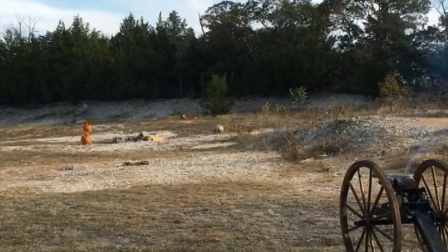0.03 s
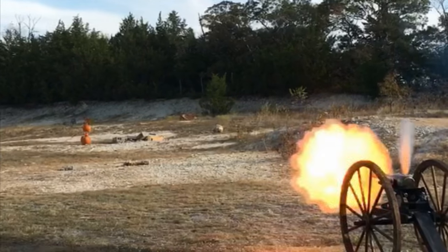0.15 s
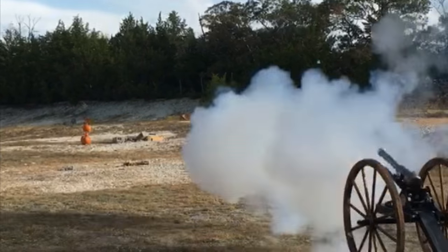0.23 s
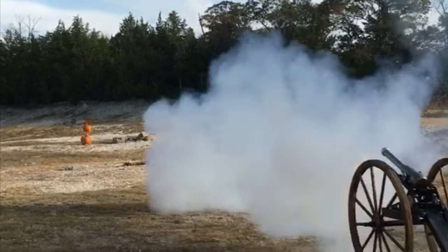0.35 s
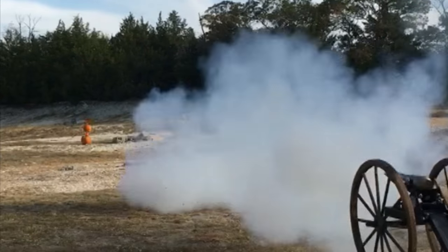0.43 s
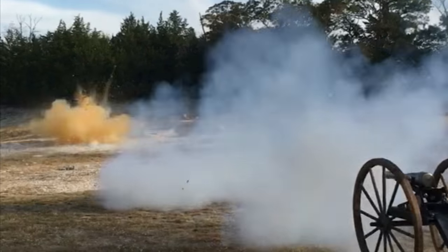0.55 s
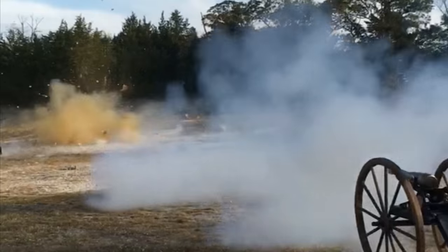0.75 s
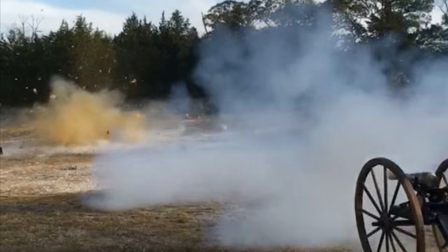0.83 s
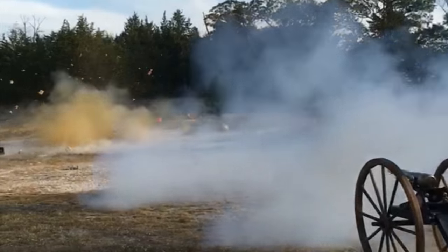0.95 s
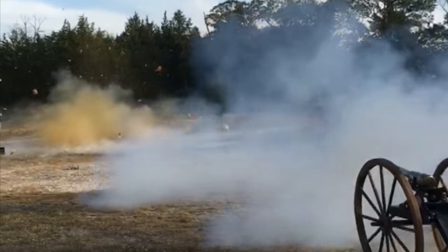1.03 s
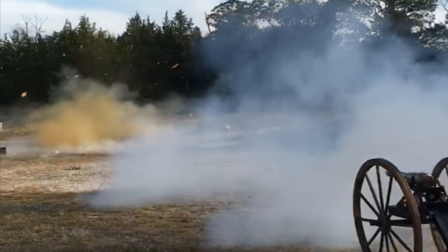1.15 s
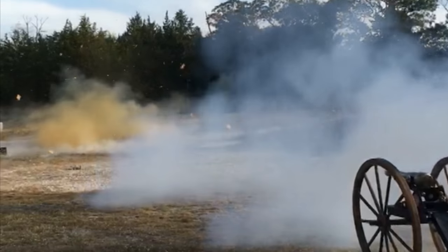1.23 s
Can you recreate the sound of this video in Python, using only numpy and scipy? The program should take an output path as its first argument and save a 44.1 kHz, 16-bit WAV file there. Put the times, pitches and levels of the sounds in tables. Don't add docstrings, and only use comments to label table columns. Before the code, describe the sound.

Outdoor cannon blast in an open field, bright cracks and a bassy push of air, then a cluster of louder, crunchy explosions downrange and a darkening tree-line rumble, captured by a small overloaded microphone.

```python
import sys
import numpy as np
from scipy import signal
from scipy.io import wavfile

SR = 44100
rng = np.random.default_rng(int(sys.argv[2]) if len(sys.argv) > 2 else 0)


def boost(x):
    u = np.asarray(x, float) / 20
    return 10 ** u


def to_wav(sig):
    pcm = np.clip(np.atleast_2d(sig), -1, 1) * 32767
    pcm = np.round(pcm).astype(np.int16)
    wavfile.write(sys.argv[1], SR, pcm.T)


N = 57330

# onset t/s, level/dB, length/s, body f/Hz, bright edge re body/dB
SHOCK_FRONTS = [(.2290, -25.5, 0.0044, 800, -15), (0.2368, -15.5, 0.0034, 600, -25),
                (0.276, -19, 0.0044, 2200, -8), (0.283, -24, 0.002, 1500, -10),
                (.2880, -21, 0.0042, 2100, -10), (.3000, -23, 0.0045, 2300, -10),
                (.3060, -23.5, 0.0032, 1000, -15), (0.2423, -15, 0.014, 776, -4),
                (.2430, -19, 0.0028, 3520, 5.5), (.3940, -29, 0.002, 2070, -35),
                (0.389, -39.5, 0.01, 292, -28), (0.411, -37, 0.0011, 2000, -23),
                (0.5254, -12, 0.0018, 784, -9), (0.5338, -14, 0.0012, 940, -15),
                (.5420, -25, 0.005, 1820, -9), (0.576, -12, 0.0038, 1000, -7.5),
                (0.582, -21, 0.002, 1100, -4), (.5950, -28, 0.0018, 900, -5),
                (0.6015, -12, 0.0018, 1100, -13), (0.604, -15.5, 0.0085, 665, -9),
                (.6150, -22, 0.0016, 1500, -7), (0.622, -19.5, 0.0035, 1280, -15),
                (0.633, -25, 0.004, 1100, -9), (0.645, -25, 0.0036, 650, -18),
                (.6222, -16, 0.0032, 2200, -30), (0.669, -37, 0.0018, 3000, -6),
                (0.674, -14.5, 0.0026, 2620, -2.5), (0.681, -18, 0.0016, 2600, -1.5),
                (0.7061, -14.5, 0.0016, 900, -39), (0.7119, -9.5, 0.001, 1020, -31),
                (.7380, -20, 0.001, 2000, -25), (.6900, -24, 0.006, 2500, -8),
                (.7240, -22, 0.006, 1500, -10), (0.743, -23, 0.002, 1000, -20),
                (.7820, -25, 0.004, 720, -30), (.9170, -33.5, 0.008, 1000, -40),
                (.9600, -30.5, 0.013, 920, -50), (1.050, -36, 0.01, 1000, -50),
                (1.099, -35.5, 0.0094, 1100, -50), (1.128, -42.5, 0.007, 1700, -50),
                (0.887, -32.5, 0.0088, 2800, -50)]
# crest t/s, peak level/dB, f/Hz, length/cycles
PRESSURE_PUNCHES = [(.2375, -17, 590, 4.9), (.2838, -10.5, 200, 2.5), (.2418, -6.5, 850, 2.9),
                    (.6022, -12, 630, 2), (0.6985, -15.5, 134, 1.9), (.2500, -22, 188, 5.6),
                    (.2575, -7, 250, 1.5), (0.49, -29, 134, 1.1), (.5290, -13.5, 209, 2.7),
                    (.5272, -5, 980, 2.3), (.5340, -13.5, 930, 3.2), (.5772, -11, 600, 2.8),
                    (.6055, -14, 560, 3.5), (.6110, -17, 640, 3.5), (.2290, -34.5, 240, 2.1),
                    (.2400, -14, 430, 2.3), (.6790, -14.5, 346, 4.6), (.6775, -7.5, 780, 2.3),
                    (.6868, -15.5, 330, 2.3), (.7045, -7.5, 247, 1.93), (0.64, -12.5, 360, 2.5),
                    (.7350, -17.5, 320, 3), (.7056, -9.5, 680, 1.9), (.7200, -15, 330, 2.0),
                    (.7700, -20, 250, 3.0), (.7940, -19.5, 250, 1.5), (.8100, -24, 270, 2.5),
                    (.8320, -18.5, 280, 2.0), (.8375, -17.5, 223, 1.8), (.8500, -21, 270, 3.6),
                    (.3650, -38.5, 197, 4.0), (.8770, -19, 67, 2.5), (.8960, -24, 70, 2.5),
                    (1.2600, -31, 85, 4.0), (1.2350, -31, 87, 2.0), (1.1760, -31, 90, 3.0),
                    (.9500, -26, 90, 2.5), (.9890, -27, 90, 2.5), (.9200, -30, 300, 5.0),
                    (.3900, -36, 290, 4.3), (0.73, -25, 69, 2.9)]
# crest t/s, peak level/dB, f/Hz, length/cycles
AIR_THUMPS = [(.2625, -7, 135, 1.67), (.2770, -8, 61.6, 2.25), (0.295, -11, 67, 1.5), (0.31, -14, 67, 2.9),
              (.3400, -28, 54.6, 3.5), (0.532, -24.5, 75, 4.6), (.5870, -5.5, 84, 2.6),
              (.6035, -10.5, 105, 1.4), (0.6135, -7.5, 90, 1.4), (.6880, -3, 98, 1.75),
              (.7015, -7.5, 69.5, 1.37), (.7092, -5.5, 125, 1.9), (.7172, -5.5, 112, 1.9),
              (.7305, -5.5, 62, 2.0), (.7440, -8, 125, 1.8), (.7505, -11, 110, 1.7),
              (0.7655, -10.5, 85, 1.7), (.7745, -16, 120, 1.8), (.7865, -18, 115, 1.7),
              (0.8015, -7.5, 115, 3), (.8300, -11, 101, 0.76), (.8450, -9.5, 90, 1.26),
              (0.859, -12, 86, 1.3), (.9250, -23, 102, 4.9), (.9690, -21, 105, 2.3), (1.0100, -22.5, 91, 4),
              (1.054, -25.5, 79, 6.6), (1.0980, -25, 93.7, 4.8), (1.1250, -26.5, 86, 6.3),
              (1.1550, -29, 83, 5.6), (1.223, -25, 92.6, 3.1), (1.2850, -28, 75, 2.1)]
# t/s, level/dB, air path/m
MUZZLE_GAS = [
    (.220, -72, 10),
    (.226, -31.5, 22),
    (.238, -30.5, 48),
    (.246, -15.5, 7.9),
    (.260, -25, 26),
    (.278, -15.5, 34),
    (.308, -22, 60),
    (.340, -38.5, 4.1),
    (.368, -45.5, 2.7),
    (.43, -47, 58),
]
# t/s, level/dB, air path/m
TREE_ECHO = [(.43, -48.5, 70), (.496, -35.5, 100), (.524, -34.5, 111), (.528, -26, 41), (.573, -32.5, 70),
             (.578, -22.5, 40), (.598, -26, 45), (.602, -21.5, 45), (.63, -23, 50), (.658, -34.5, 50),
             (.673, -29.5, 40), (.678, -23, 50), (.736, -22, 64.4), (.76, -27.5, 71), (.9, -31, 115),
             (1.0, -35, 180), (1.08, -34.5, 228), (1.17, -39.5, 293), (1.3, -45.5, 380)]
# crest t/s, peak level/dB, f/Hz, length/cycles
WIND_LUMPS = [(.005, -29.5, 71.5, 3.5), (.031, -42.5, 109, 3.1), (.056, -41, 80, 2.9),
              (.102, -33, 76.5, 2.6), (.122, -33.5, 93, 2), (.134, -30, 81, 1.24), (.150, -36, 93, 0.96),
              (.161, -32.5, 83, 1.9), (.216, -35, 80, 1.4), (.400, -34, 60.3, 2.2), (.440, -46, 55, 2.2),
              (.478, -34, 320, 3.3), (.030, -46, 250, 3.0), (.110, -46, 200, 3.0), (.485, -30.5, 69.4, 3.4)]
# f/Hz, density/dB
MUZZLE_SPECTRUM = [(100, -7), (200, 4), (450, -2.5), (1000, 1.5), (2200, 1), (5000, -5.5), (9000, -8),
                   (15000, -16.5)]
# f/Hz, density/dB
ECHO_SPECTRUM = [(60, -15), (200, 4), (420, -3), (800, 4), (2200, 1.5), (5000, -5), (9000, -9),
                 (15000, -19.5)]
# f/Hz, density/dB
FIELD_SPECTRUM = [(130, -42), (220, -2.5), (384, -3.5), (603, -20.5), (899, -11.5), (1870, -15.5),
                  (6300, -14.5), (13000, -16), (14800, -40)]

AIR_LOSS_10KHZ_DB_PER_M, AIR_LOSS_EXPONENT = 0.12, 1.6
CRACKLE_DEPTH, CRACKLE_FULL_HZ = 1.8, 1500
SNAPS_PER_S, SNAP_SPREAD_DB = 2500, 3.0
STEEPEN_RAD = 0.55


def rms_one(x):
    return x / np.sqrt(np.mean(x ** 2) + 1e-20)


def band(x, low_hz, high_hz, order=2):
    sos = signal.butter(order, [low_hz, high_hz], "band", fs=SR, output="sos")
    return signal.sosfilt(sos, x)


def drift(rate_hz):
    pole = np.exp(-2 * np.pi * rate_hz * 40 / SR)
    draws = rng.standard_normal(N // 40 + 2002)
    slow = signal.lfilter([1], [1, -2 * pole, pole * pole], draws)[2000:]
    return np.interp(np.arange(N) / 40, np.arange(len(slow)), rms_one(slow))


def snapping_noise(snap_share):
    white = rng.standard_normal((2, N))
    size_db = SNAP_SPREAD_DB * np.minimum(rng.exponential(1, N), 4)
    sizes = boost(size_db) * rng.choice([-1, 1], N)
    snaps = rms_one(sizes * (rng.random(N) < SNAPS_PER_S / SR))
    return np.sqrt(1 - snap_share) * white + np.sqrt(snap_share) * snaps * [[1], [-1]]


def coloured(spectrum, patchy_db, path_m=0., snap_share=0.):
    together = drift(25)
    fast = CRACKLE_DEPTH * np.clip(drift(250), -2, 2)
    noise = snapping_noise(snap_share)
    hzs, dbs = np.transpose(spectrum)
    edges_hz = 100 * 2 ** np.arange(0, 7.4, 1 / 5)
    out = 0
    for k, (low_hz, high_hz) in enumerate(zip(edges_hz, edges_hz[1:])):
        hz = np.sqrt(low_hz * high_hz)
        density_db = np.interp(np.log(hz), np.log(hzs), dbs)
        air_db = AIR_LOSS_10KHZ_DB_PER_M * path_m * (hz / 10000) ** AIR_LOSS_EXPONENT
        shared = together + fast * min(hz / CRACKLE_FULL_HZ, 1)
        flicker_db = patchy_db * (0.47 * shared + drift(14))
        out = out + boost(density_db - air_db + flicker_db) * band(noise[k % 2], low_hz, high_hz, order=3)
    return out


def swings(rows):
    t, out = np.arange(N) / SR, np.zeros(N)
    for crest_s, db, hz, cycles in rows:
        turns = (t - crest_s) * hz
        phase = 2 * np.pi * turns
        wave = np.cos(phase + STEEPEN_RAD * boost(db) * np.cos(phase))
        swell = np.cos(np.pi * np.clip(turns / cycles, -.5, .5)) ** 2
        out += boost(db) * wave * swell
    return out


def gas_rush(rows, spectrum, rumble_db, snap_share=0.):
    t = np.arange(N) / SR
    s, dbs, paths_m = np.transpose(rows)
    db, path_m = np.interp(t, s, dbs), np.interp(t, s, paths_m)
    roar = 2.636 * coloured(spectrum, 1.3, np.maximum(path_m, 0), snap_share)
    roll = rms_one(band(rng.standard_normal(N), 45, 128, order=3))
    return (t >= s[0]) * boost(db) * (roar + boost(rumble_db) * roll)


def cracks():
    rise_s, body_fall_s, edge_fall_s = 0.00028, 0.0027, 0.0012
    spread = 1 + 1 / 2.58
    out, t = np.zeros(N + SR), np.arange(SR // 20) / SR
    for onset_s, db, length_s, hz, edge_db in SHOCK_FRONTS:
        noise = rng.standard_normal((2, len(t)))
        rise = np.minimum(t / rise_s, 1)
        past_s = np.maximum(t - length_s, 0)
        shape = rise * np.exp(-past_s / body_fall_s)
        body = band(noise[0] * shape, hz / spread / 1.71, hz * spread)
        body = body * np.sqrt(np.sum(shape ** 2) / np.sum(body ** 2))
        edge = rms_one(band(noise[1], 1700, 9700, order=1)) * rise * np.exp(-past_s / edge_fall_s)
        i = int(onset_s * SR)
        out[i:i + len(t)] += boost(db) * (body + boost(edge_db) * edge)
    return out[:N]


def punches():
    return swings(PRESSURE_PUNCHES)


def thumps():
    return swings(AIR_THUMPS)


def muzzle_gas():
    jet = gas_rush(MUZZLE_GAS, MUZZLE_SPECTRUM, rumble_db=-4, snap_share=.3)
    return jet * (np.arange(N) / SR < .5)


def tree_echo():
    return gas_rush(TREE_ECHO, ECHO_SPECTRUM, rumble_db=-2)


def wind():
    steady = rms_one(band(rng.standard_normal(N + 4000), 40, 130, order=3)[4000:])
    return boost(-50) * steady + swings(WIND_LUMPS)


def grass_and_insects():
    duck_db = np.interp(np.arange(N) / SR, [0, .06, .22, .4, 1.0], [2, 0, -2, -4.5, -22])
    insects = rms_one(band(rng.standard_normal(N), 6600 - 350, 6600 + 350))
    grass = rms_one(coloured(FIELD_SPECTRUM, 0.62))
    return boost(-67 + duck_db + 2.0 * drift(14)) * insects + boost(-59.5 + duck_db) * grass


def scene():
    blasts = cracks() + punches() + thumps() + muzzle_gas()
    return (blasts + tree_echo() + wind() + grass_and_insects())[None]


def low_pass(x):
    return signal.sosfilt(signal.butter(12, 16650, fs=SR, output="sos"), x)


def record(dry):
    x = dry / (1 + (dry / .7) ** 4) ** .25
    x = signal.sosfilt(signal.butter(2, 20, "high", fs=SR, output="sos"), x)
    x = signal.sosfilt(signal.cheby2(10, 40, 16100, fs=SR, output="sos"), x)
    return low_pass(x)


dry = scene()
out = record(dry)
to_wav(out)
```